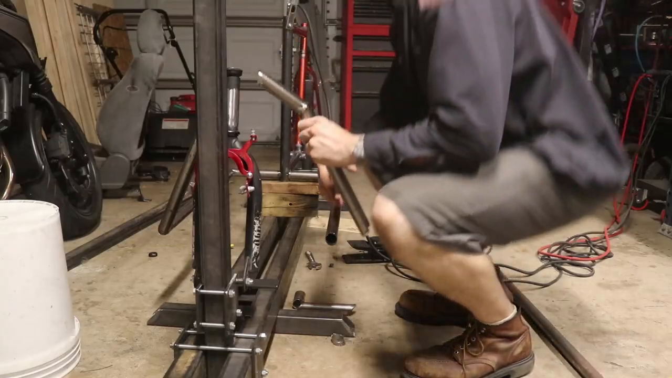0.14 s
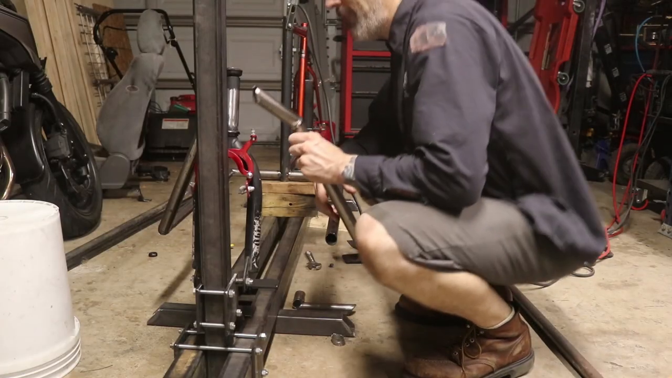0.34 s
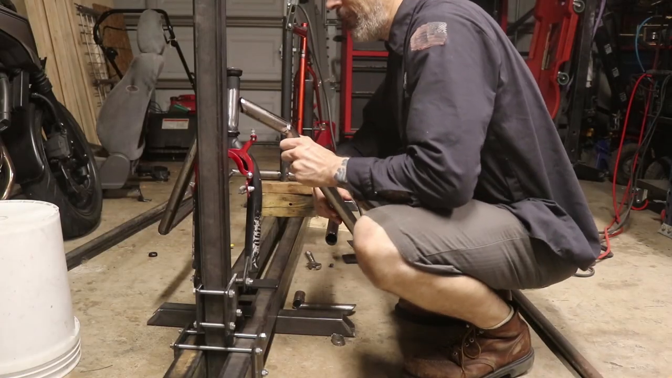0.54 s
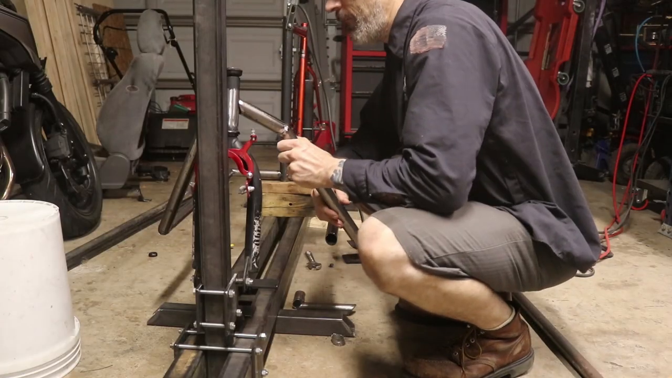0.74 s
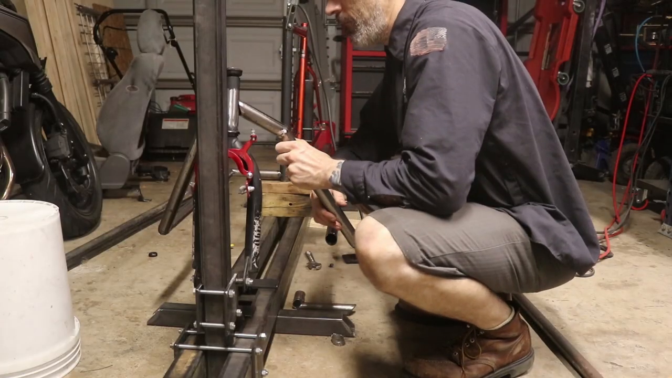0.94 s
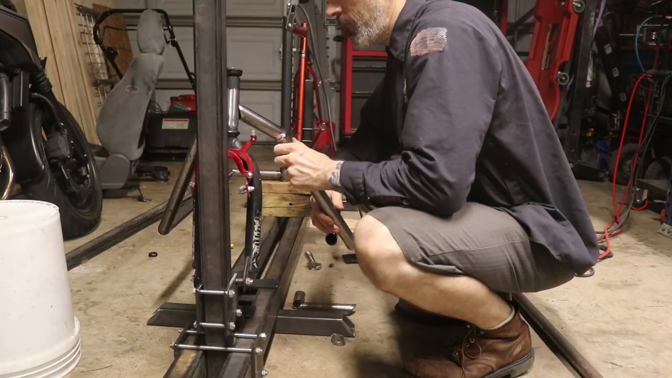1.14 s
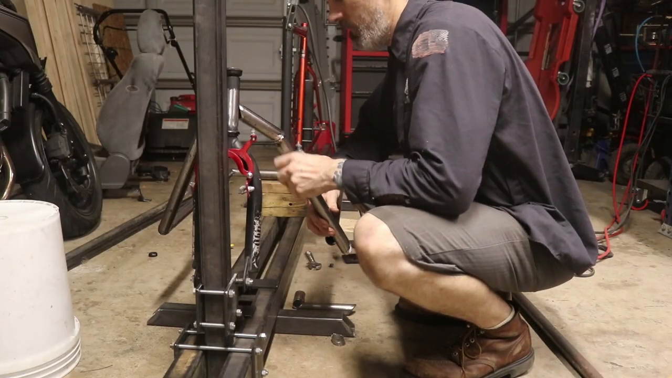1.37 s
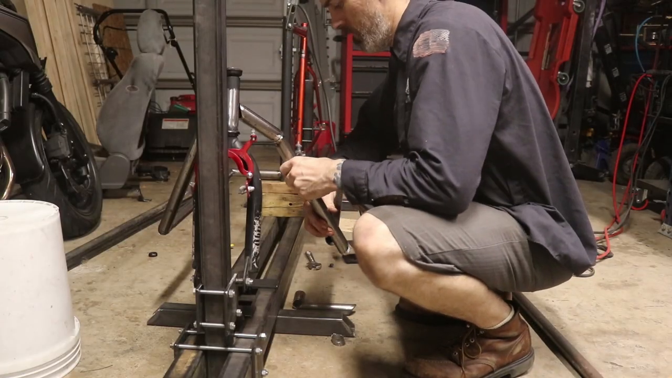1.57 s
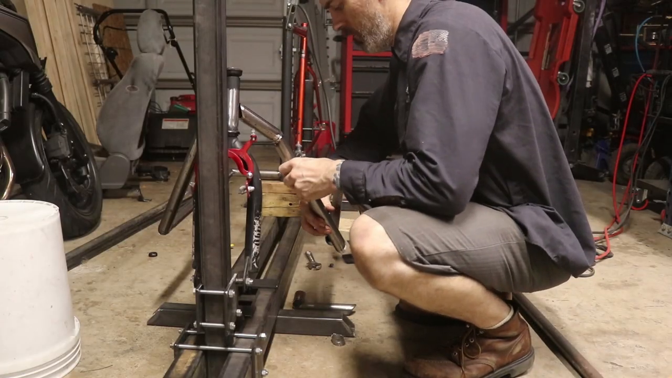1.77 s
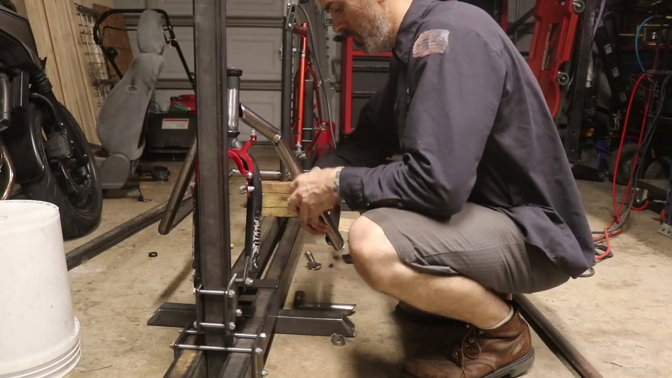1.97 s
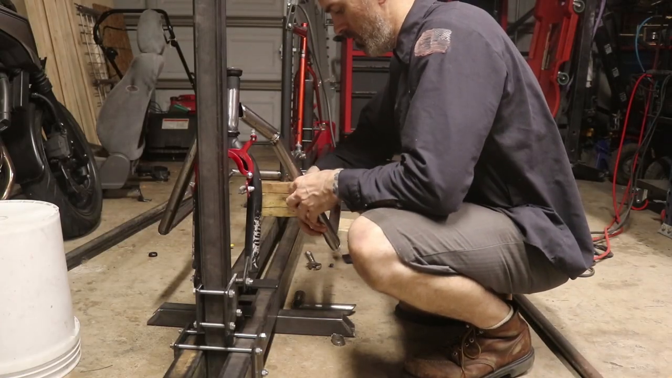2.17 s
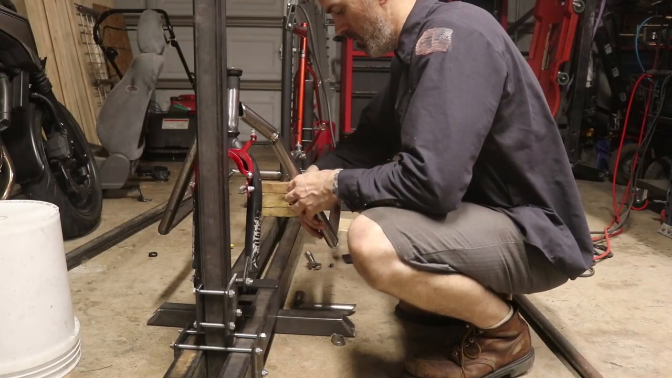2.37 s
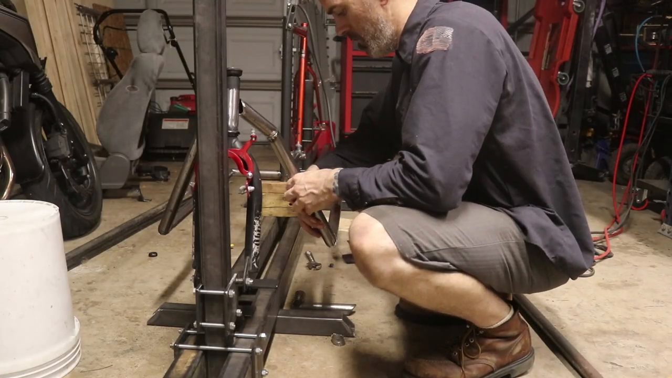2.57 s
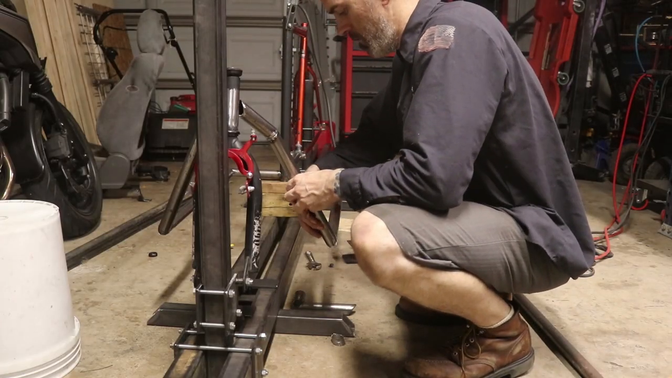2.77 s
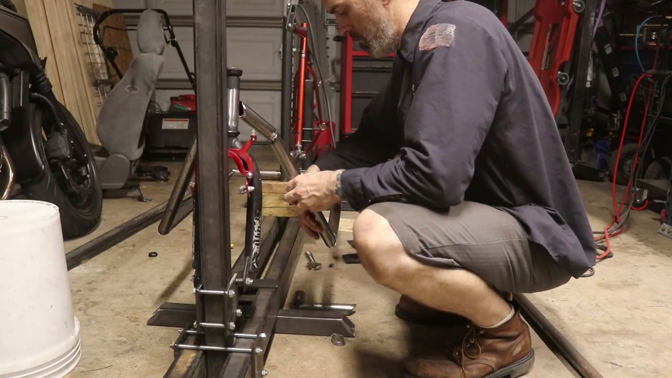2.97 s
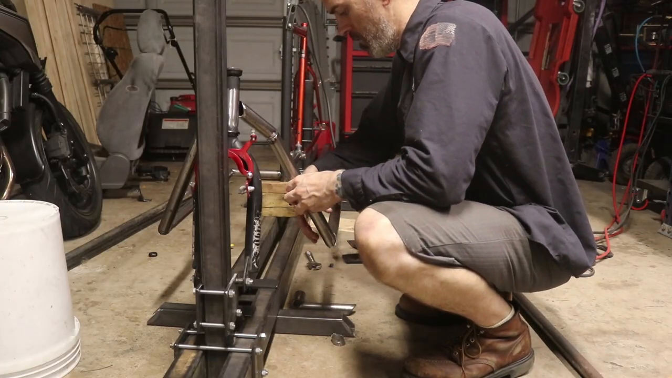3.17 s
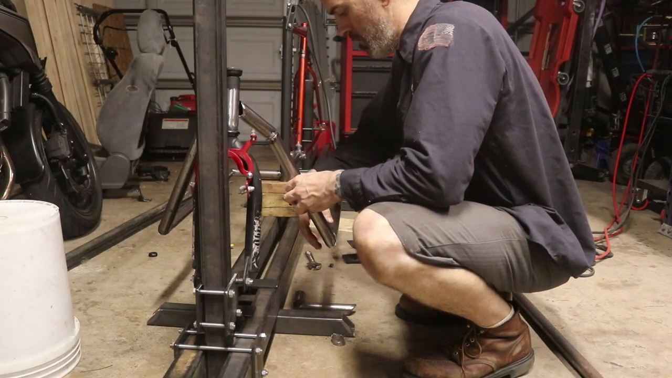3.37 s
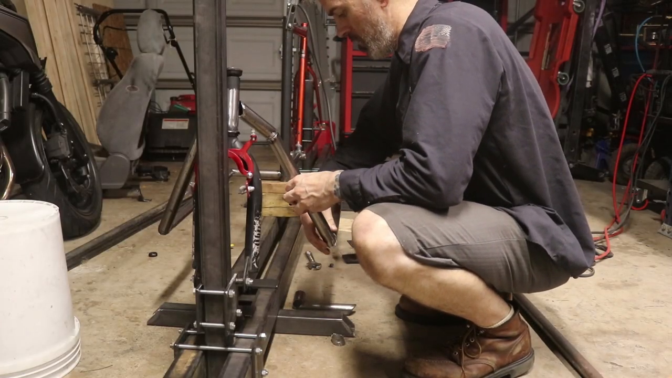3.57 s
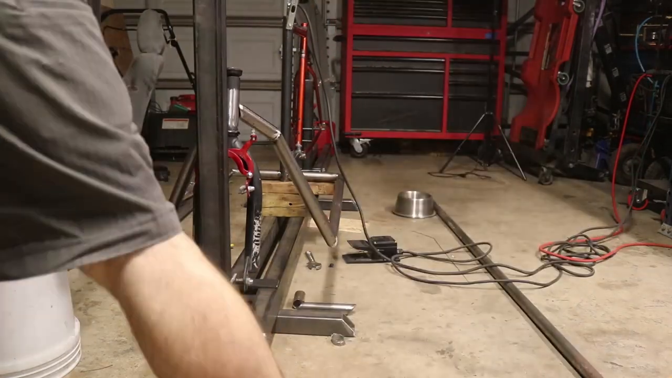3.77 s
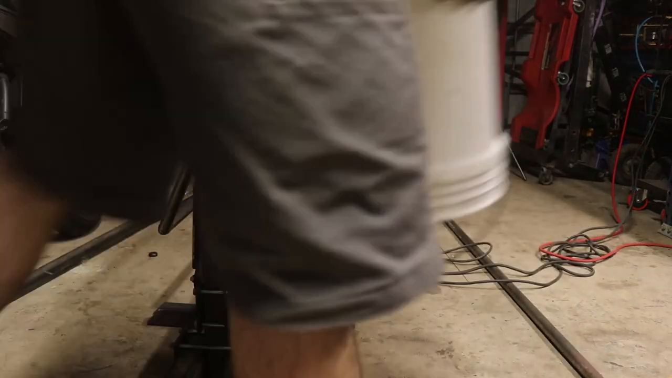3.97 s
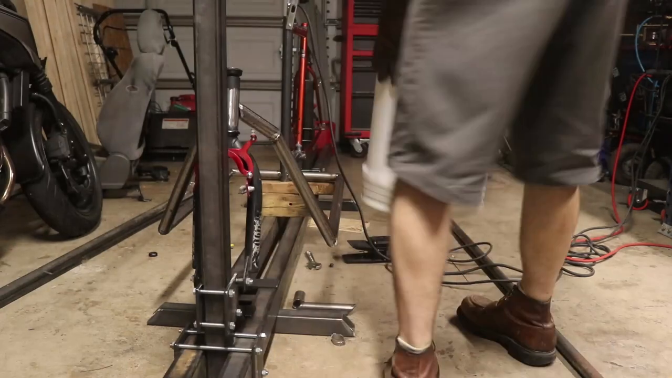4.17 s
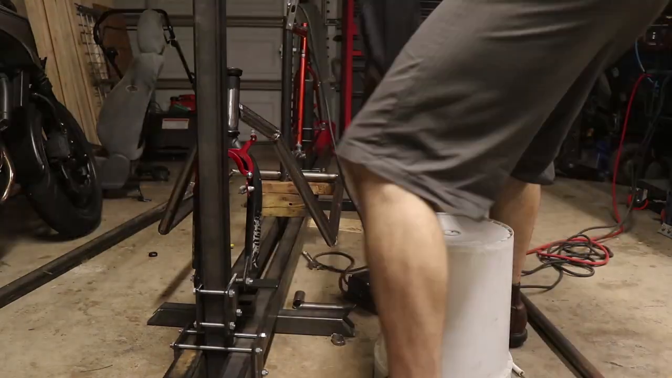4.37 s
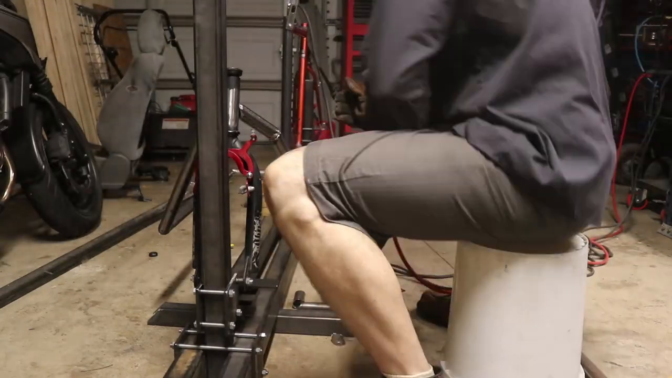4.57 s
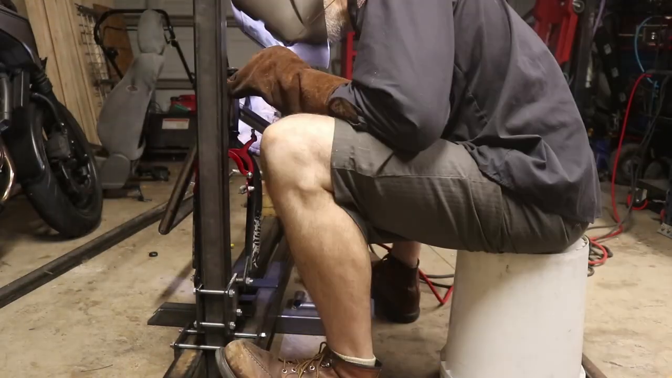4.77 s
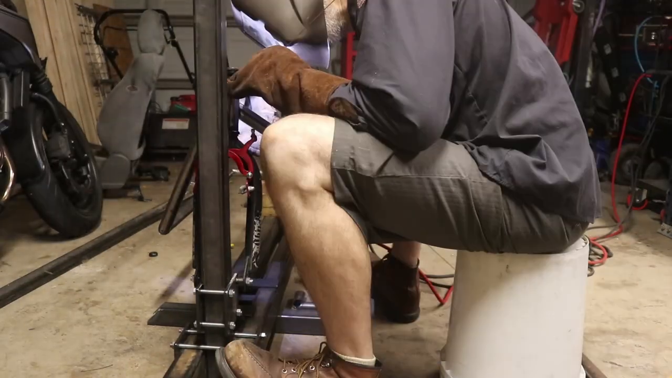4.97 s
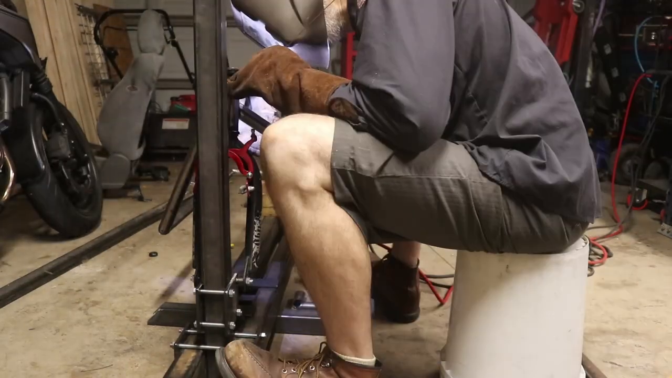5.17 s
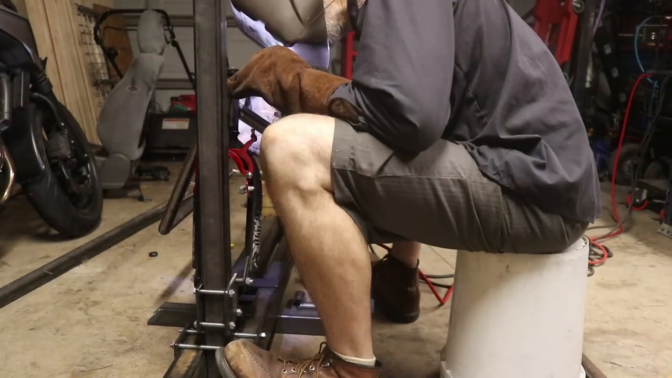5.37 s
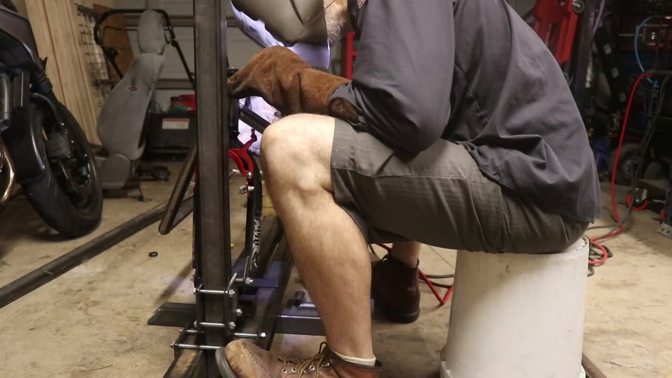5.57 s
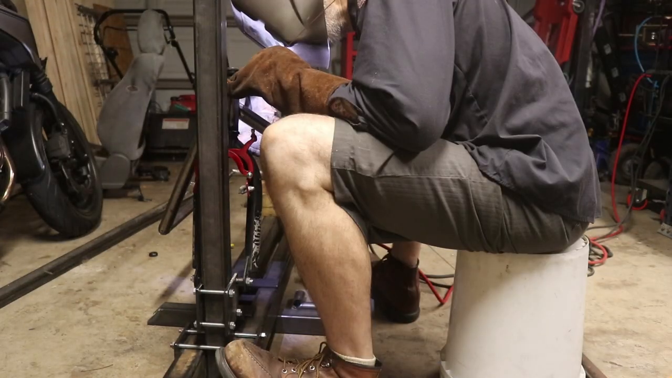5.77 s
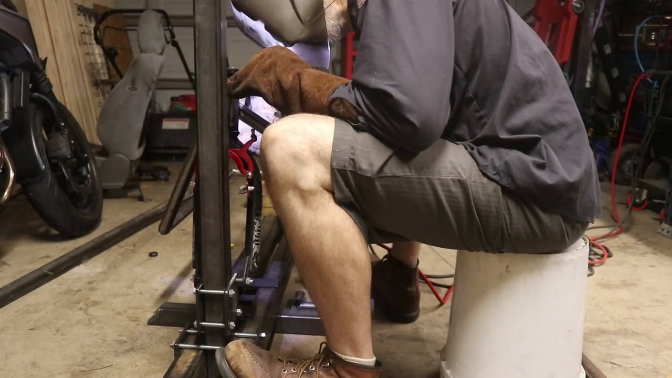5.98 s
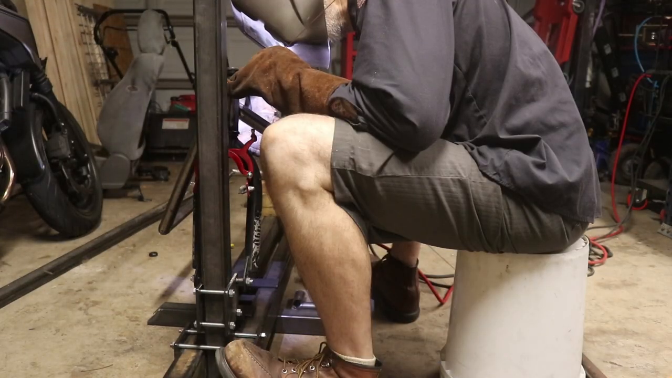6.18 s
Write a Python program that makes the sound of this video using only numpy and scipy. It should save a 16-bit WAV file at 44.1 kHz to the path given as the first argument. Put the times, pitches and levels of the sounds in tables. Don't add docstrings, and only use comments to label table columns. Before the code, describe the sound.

Sparse steel clinks and cloth rustles, an abrupt fast-motion burst of whining fan and plastic bucket thumps, then steady fan hum and crackling welding arc.

```python
import sys
import numpy as np
from scipy import signal
from scipy.fft import rfft, irfft, next_fast_len
from scipy.io import wavfile
from scipy.ndimage import map_coordinates

SR = 44100
rng = np.random.default_rng(int(sys.argv[2]) if len(sys.argv) > 2 else 0)


def bounce(signal):
    frames = np.transpose(np.atleast_2d(signal))
    limited = np.clip(frames, -1, 1)
    pcm = np.round(limited * 32767).astype(np.int16)
    wavfile.write(sys.argv[1], SR, pcm)


def magnitude_from_level(level_db):
    exponent = np.asarray(level_db, float) / 20
    return 10 ** exponent


N = 274302
TIME = np.arange(N) / SR
CUT_FAST, CUT_TRUE = 3.7755, 4.8435
SPEED = 7
TAIL = SR // 2


def unit(x):
    return x / np.sqrt(np.mean(x ** 2) + 1e-20)


def along(points, hz):
    f, v = np.transpose(points)
    return np.interp(np.log(hz + 1), np.log(f + 1), v)


def curves(rows):
    s, *cols = np.transpose(rows)
    return [np.interp(TIME, s, c, left=-150, right=-150) for c in cols]


def wobble(rate):
    return map_coordinates(rng.standard_normal(int(N * rate / SR) + 4), [TIME * rate])


def filtered(x, response):
    m = next_fast_len(len(x) + 8192)
    return irfft(rfft(x, m) * response(np.fft.rfftfreq(m, 1 / SR)), m)[:len(x)]


def low_cut(hz):
    return lambda f: (1j * f / (hz + 1j * f)) ** 4


def modes(peaks):
    def response(f):
        total = 0
        for k, (c, w, db) in enumerate(peaks):
            total = total + (-1) ** k * magnitude_from_level(db) * 1j * f * w / (c * c - f * f + 1j * f * w)
        return total
    return response


def rush(response, grain_db=0):
    return unit(filtered(rng.standard_normal(N) * magnitude_from_level(grain_db * wobble(400)), response))


def add(track, s, sound):
    part = track[round(s * SR):][:len(sound)]
    part += sound[:len(part)]


def stroke(s, hold, db, rise, fall, sag=0):
    t = TIME - s
    return db - rise * np.maximum(-t, 0) - sag * np.clip(t, 0, hold) - fall * np.maximum(t - hold, 0)


# frequency in Hz, density in dB per Hz.
FLOOR = [(12, -44.5), (20, -38), (59, -7), (122, -5), (246, -12), (298, -13), (383, -18.5), (1460, -29),
         (2100, -27), (2350, -30.5), (4580, -30), (5720, -31.5), (15600, -32.5)]
# frequency in Hz, level in dB rms.
LAMP_HUM = [(120, -65), (240, -64)]


def room_floor():
    out = magnitude_from_level(-55) * rush(lambda f: magnitude_from_level(along(FLOOR, f)))
    for hz, db in LAMP_HUM:
        out += magnitude_from_level(db + 3.0 * wobble(4.48)) * np.sin(2 * np.pi * hz * TIME)
    return out


# frequency in Hz, density in dB per Hz.
PORT_HISS = [(12, -19), (20, -8), (260, -10), (290, -12), (651, -10.5), (791, -11.5), (12800, -10),
             (15600, -9.5)]
PORT_HISS_DB = [-59.5, -67, -60]


def port_hiss(stretch):
    return magnitude_from_level(np.array(PORT_HISS_DB)[stretch]) * rush(lambda f: magnitude_from_level(along(PORT_HISS, f)))


# start in seconds, hold in seconds, level in dB, rise and fall in dB/s.
CLOTH_MOVES = [
    [(.035, 0.018, -48, 50, 47), (.234, 0.016, -45, 83, 41)],
    [(1.615, 0.072, -47, 62, 106), (1.938, .005, -61.5, 400, 170)],
]
# frequency in Hz, density in dB per Hz.
WEAVES = [
    [(180, -28), (300, 0), (446, 0), (631, -4), (697, -5.5), (1570, -6), (1940, -8.5), (4160, -6.5),
     (15600, -24)],
    [(880, -7), (1500, -7), (2220, -6.5), (2650, -1), (3350, -4.5), (4960, 0), (5410, -3.5), (15600, -14.5)],
]
# time in seconds, peak in dB, frequency in Hz.
SNAPS = [(0.0054, -31, 2540), (0.0358, -34, 3990), (0.0914, -40, 4370), (0.1496, -38, 4170),
         (0.187, -34, 4970), (0.2714, -35, 4130), (0.4968, -40, 4220), (0.5444, -41, 3420),
         (1.3668, -39, 1900), (1.408, -42, 8000), (1.4456, -41, 4180), (1.4945, -39, 4930),
         (1.5469, -39, 2640), (1.5913, -33, 4890), (1.6114, -35, 4920), (1.6734, -40, 2650),
         (1.7154, -35, 4350), (2.9841, -32, 4680), (2.9843, -36, 2600), (2.9846, -37, 6000)]


def cloth():
    out = np.zeros(N)
    for moves, weave in zip(CLOTH_MOVES, WEAVES):
        level_db = np.max([stroke(*move) for move in moves], axis=0) + 1.2 * wobble(30.4)
        out += magnitude_from_level(level_db) * rush(lambda f: magnitude_from_level(along(weave, f)), grain_db=2.0)
    t, snaps = TIME[:200], np.zeros(N)
    for s, db, hz in SNAPS:
        decay_db = 60 * t * hz / 7
        add(snaps, s, magnitude_from_level(db + 3 - decay_db) * np.cos(2 * np.pi * hz * t))
    return out + filtered(snaps, low_cut(300))


# start in seconds, length in seconds, first Hz, last Hz, level in dB.
SCREW_TURNS = [
    (2.685, .13, 11250, 11150, -72),
    (2.865, .108, 11050, 11250, -70),
    (2.99, .04, 10950, 10750, -77),
    (3.05, .05, 10550, 10300, -76),
    (3.196, .07, 10000, 9750, -77),
]


def squeak():
    arch_hz_per_s, edge_db_per_s = 1300, 1500
    out = np.zeros(N)
    for s, length, first_hz, last_hz, db in SCREW_TURNS:
        u = np.clip((TIME - s) / length, 0, 1)
        hz = first_hz + (last_hz - first_hz) * u + arch_hz_per_s * length * np.sin(np.pi * u)
        level = magnitude_from_level(stroke(s, length, db + 5.0, edge_db_per_s, edge_db_per_s))
        out += level * np.sin(2 * np.pi * np.cumsum(hz) / SR)
    return out


# frequency in Hz, t60 in seconds.
GARAGE = [(200, 0.76), (1000, 0.62), (4000, 0.44), (12000, 0.26)]


def garage(size):
    hz, t, z = signal.stft(rng.standard_normal(size), SR, nperseg=256)
    decay = magnitude_from_level(-60 * t / along(GARAGE, hz)[:, None])
    tail = signal.istft(z * decay, SR, nperseg=256)[1][:size]
    return tail / np.linalg.norm(tail)


# time in seconds, peak in dB, brightness in dB per octave.
TAPS = [
    [(0.644, -24, -3)],
    [(0.837, -20.5, -2.5)],
    [(1.106, -43, -1), (1.127, -36, -2.5), (1.148, -38, -5), (1.183, -29, -4), (1.233, -38, -5),
     (1.366, -57, -2)],
    [(2.205, -49, -1.5), (2.462, -44.5, -0.5), (2.474, -41.5, -3), (2.5, -41.5, -5)],
    [(2.814, -34, -7), (2.849, -51, -3)],
    [(2.983, -36.5, -5.5), (3.029, -62, -19), (3.139, -50.5, 5)],
    [(3.3195, -40.5, -6), (3.352, -42, -8)],
]
# frequency in Hz, width in Hz, level in dB.
LOOSE = [(478, 51, -8), (892, 21, -4), (1070, 95, -8), (1556, 12, 2), (1910, 32, -3.5), (3000, 54, -25),
         (3550, 30, -10), (3670, 22, -4), (3900, 22, -15), (4400, 30, -2.5), (4910, 9.8, -2),
         (5860, 24, -6), (6400, 26, -24), (7570, 27, -8.5)]
HELD = [(415, 34, -1.5), (878, 40, 0), (1020, 43, 1), (1380, 110, 0.5), (1893, 41, 4.5), (2520, 62, -2),
        (3520, 40, -10), (3850, 32, -5.5), (4390, 27, -4), (4550, 13, -5), (4630, 13, -7), (5490, 40, -12),
        (5800, 40, -13), (6750, 29, -22), (11800, 37, -32)]
SEATING = [(431, 84, 0.5), (857, 11, -9), (1012, 40, 3), (1495, 220, -5.5), (1320, 54, -3), (1860, 57, 2.5),
           (2557, 30, -8.5), (3550, 47, -8), (4380, 60, -9.5), (4840, 33, -8), (5920, 45, -18),
           (6600, 53, -17), (7200, 51, -20), (7800, 57, -18), (10400, 100, -28), (11950, 100, -22)]
CLAMPED = [
    [(508, 95, -3.5), (780, 120, -8.5), (1013, 68, -9), (1840, 77, -8.5), (2490, 68, -13), (2730, 41, -12),
     (3550, 42, -17), (4340, 32, -8), (4800, 40, -16), (5480, 56, -13)],
    [(397, 93, -8.5), (823, 69, -5), (1020, 79, -10), (1654, 95, -4), (2740, 43, -15), (4450, 110, -8.5),
     (6000, 100, -22)],
    [(380, 67, -11), (1020, 130, -6.5), (1890, 56, -12), (2680, 46, -15), (3900, 60, -16),
     (4500, 110, -4.5), (5800, 85, -24)],
    [(498, 37, -6.5), (1020, 61, -1.5), (1530, 54, -9), (1910, 25, -12), (2570, 18, -9), (3610, 20, -12),
     (4400, 49, -18), (4560, 40, -7)],
]
GRIPS = [LOOSE, HELD, SEATING, *CLAMPED]


def tube_taps():
    out, t = np.zeros(N), TIME[:TAIL]
    for taps, grip in zip(TAPS, GRIPS):
        loose = modes([(hz, w * (1.46 + hz / 7000), db) for hz, w, db in grip])
        for s, db, tilt_db in taps:
            tilt = lambda f: magnitude_from_level(tilt_db * np.log2((f + 200) / 1200)) * f / (f + 300)
            blow = garage(size=TAIL) * (1 + 0.86 * magnitude_from_level(-60 * t / 0.018))
            clatter = filtered(blow, lambda f: (loose(f) + magnitude_from_level(-15.0) / (1 + (f / 7000) ** 2)) * tilt(f))
            ring = np.zeros(TAIL)
            for hz, w, level_db in grip:
                decay = magnitude_from_level(level_db - 60 * t / (0.88 * along(GARAGE, hz)))
                weight = tilt(hz) / (1 + (hz / 3200) ** 2) / (1 + w / 30)
                ring += decay * weight * np.sin(2 * np.pi * hz * t)
            both = clatter / np.std(clatter[:1500]) + magnitude_from_level(-3.5) * ring / np.std(ring[:1500])
            add(out, s, magnitude_from_level(db - 10.5) * both * (1 - np.exp(-t / 0.00036)))
    return out


# start in seconds, hold in seconds, level in dB, rise and fall in dB/s.
SLIDES = [
    (1.121, 0.054, -33, 214, 1500),
    (2.485, 0.03, -47.5, 122, 150),
    (2.816, 0.083, -52, 400, 65),
]


def tube_slides():
    out = np.zeros(N)
    for move, grip in zip(SLIDES, GRIPS[2:5]):
        rubbed = modes([(hz, w * (.8 + hz / 12000), db) for hz, w, db in grip])
        scrape = lambda f: magnitude_from_level(-23.5) * f / (f + 500) / (1 + (f / 6000) ** 2)
        rub = magnitude_from_level(stroke(*move) - 3.5) * rush(lambda f: rubbed(f) + scrape(f), grain_db=3.5)
        out += .5 * rub + signal.fftconvolve(rub, garage(size=TAIL))[:N]
    return out


# start in seconds, frequency in Hz, level
# in dB, t60 in seconds.
THUDS = [(.645, 448, -40.5, 0.59), (.645, 1012, -43, 0.39), (.645, 1934, -40.5, 0.73),
         (.84, 300, -47, 0.94), (.84, 1870, -45, 0.37), (0.899, 157.5, -42.5, 0.71),
         (0.646, 1556, -33.5, .6), (.645, 4365, -47, .3), (1.186, 3600, -36, .04),
         (1.2022, 1500, -31, .012), (1.2275, 1700, -31, .01), (1.2465, 1500, -33, .012),
         (1.2515, 1800, -33, .01), (.838, 1840, -30, .15), (1.126, 1880, -35, .25), (1.131, 1885, -36, .2),
         (1.13, 1012, -39, 0.37), (1.182, 1880, -29, .16), (1.182, 1400, -33, .08),
         (1.228, 1013, -39, 0.52), (1.181, 278, -37.5, 0.51), (1.183, 1024, -32, 0.3),
         (2.473, 273, -50.5, 1), (2.47, 510, -49, 0.4), (2.82, 259, -44.5, 0.51), (2.816, 2740, -58, .6),
         (2.83, 1650, -54, .6), (2.816, 830, -50, .5), (2.47, 830, -54, .4), (3.15, 3950, -62, .2),
         (3.322, 3600, -60, .15), (2.821, 1020, -58, 0.47), (2.984, 1500, -40, .012),
         (2.989, 420, -46.5, 0.47), (3.324, 1036, -47, 0.65), (3.328, 268, -58, 0.62),
         (3.348, 514, -65, 0.52)]


def frame_thuds():
    out, t = np.zeros(N), TIME[:TAIL]
    for s, hz, db, t60 in THUDS:
        onset = 1 - np.exp(-t * hz / 3)
        add(out, s, magnitude_from_level(db - 60 * t / t60) * np.sin(2 * np.pi * hz * t) * onset)
    return out


# null in seconds, level in dB of the swell after it, null depth in dB.
NULLS = [(3.66, -35, -6), (3.875, -33, -6), (4.012, -28, -16), (4.093, -30, -22), (4.178, -28, -26),
         (4.259, -29, -12), (4.346, -35, -26), (4.401, -29, -22), (4.548, -46, -24), (4.615, -32, -20),
         (4.782, -34, -14), (4.88, -36, -9)]


def passing():
    s, db, null_db = np.transpose(NULLS)
    place = np.interp(TIME, s, np.arange(len(s)))
    deep = magnitude_from_level(np.interp(TIME, s, np.minimum(null_db, -1)))
    swell = np.abs(np.sin(np.pi * place)) ** 0.89
    return db[place.astype(int)] - 1.5 + 20 * np.log10(deep + (1 - deep) * swell)


# time in seconds, level in dB.
SEATED = [(4.84, -42), (5.05, -44), (5.11, -36), (5.2, -46), (5.52, -38), (5.56, -35), (5.95, -29),
          (6.23, -31)]


def settling():
    return curves(SEATED)[0]


# frequency in Hz, density in dB per Hz.
AIR = [
    [(18, -91), (30, -59), (110, -50), (203, -40.5), (325, -29.5), (360, -32.5), (534, -19.5), (811, -21.5),
     (974, -13), (1690, -5.5), (2050, -6), (3000, -10.5), (3510, -6.5), (4000, -8.5), (7300, -11),
     (15600, -17.5)],
    [(12, -83), (20, -48), (104, -26.5), (246, -7), (429, -15), (521, -8.5), (566, -12), (962, -15),
     (1050, -14), (1270, -17), (1630, -18.5), (1880, -20.5), (4330, -26), (15600, -56)],
]
# frequency in Hz, width in Hz, lift in dB.
HOUSING = [(244, 25, 2.5), (276, 25, 3), (336.5, 18, 5.5), (841, 21, 6.5), (1043, 17, 7.5), (1178, 29, 4.5),
           (1546, 20, 6), (1651, 21, 8), (2100, 50, 3.5), (4220, 520, 3)]
# frequency in Hz, level in dB.
BLADE = [(517, 2.5), (1037, -12.5), (539, -18)]


def fan(air_db, tone_db, air, speed):
    def lift(f):
        peaks = [1 + (magnitude_from_level(db) - 1) / (1 + (2 * (f / speed - c) / w) ** 2) for c, w, db in HOUSING]
        return np.prod(peaks, axis=0)
    out = magnitude_from_level(air_db + 0.55 * wobble(6 * speed)) * rush(lambda f: magnitude_from_level(along(air, f)) * lift(f))
    for k, (hz, db) in enumerate(BLADE):
        phase = 2 * np.pi * hz * speed * TIME + 0.34 * speed ** .35 * wobble(4 * speed)
        if k == 0:
            level_db = tone_db + 1.0 * wobble(8 * speed)
        else:
            level_db = air_db - 9.5 + 3 * wobble(2.3 * speed)
        out += magnitude_from_level(level_db + db + 4.5) * np.sin(phase)
    return out


# time in seconds, frequency in Hz, level in dB.
TRAFFIC = [(3.78, 347, -62), (3.9, 337, -62), (3.96, 321.5, -59), (4.02, 310, -74), (4.1, 317, -72),
           (4.14, 322, -57), (4.3, 313, -59), (4.37, 299, -71)]


def traffic():
    hz, db = curves(TRAFFIC)
    return magnitude_from_level(db) * np.sin(2 * np.pi * np.cumsum(hz) / SR)


# time in seconds, peak in dB, frequency in Hz, t60 in seconds.
BUMPS = [(3.8665, -18, 682, 0.041), (3.8669, -21, 547, 0.051), (3.8688, -11.5, 1080, 0.032),
         (3.872, -13, 1032, 0.036), (3.8728, -11.5, 690, 0.03), (3.8765, -16, 1150, 0.018),
         (3.881, -18, 2000, 0.0091), (3.935, -20, 1970, 0.02), (3.988, -22, 1140, .015),
         (4.136, -25, 1620, 0.044), (4.157, -14, 1740, 0.018), (4.18, -23, 1940, .04),
         (4.256, -24, 1000, 0.011), (4.297, -30, 618, 0.019), (4.299, -17.5, 1300, 0.011),
         (4.3478, -13, 2900, .008), (4.347, -14, 4700, .012), (4.347, -16, 6950, .03),
         (4.535, -18, 6950, .03), (3.869, -19, 7000, .008), (3.8645, -22, 2100, .008),
         (4.347, -13.5, 1513, 0.068), (4.353, -26, 1015, .06), (4.362, -23, 1060, 0.062),
         (4.414, -17, 1210, 0.012), (4.43, -15, 1270, 0.011), (4.489, -24, 1070, 0.025),
         (4.503, -17.5, 1080, .02), (4.515, -21, 900, .03), (4.522, -22, 1050, .03),
         (4.526, -12, 1100, .03), (4.5275, -19, 2950, .012), (4.530, -9, 1260, 0.04),
         (4.536, -10, 1260, 0.025), (4.541, -13, 1140, 0.025), (4.5458, -12, 1100, 0.03),
         (4.548, -11, 1100, 0.018), (4.5555, -14, 1050, .02), (4.560, -13.5, 800, 0.039),
         (4.565, -16, 900, .02), (4.5705, -16, 1080, .03), (4.579, -8, 1130, 0.049),
         (4.589, -18, 1250, .03), (4.595, -18, 1210, .025), (4.6103, 0.5, 1170, 0.022),
         (4.61, -13.5, 2610, 0.0093), (4.6132, -7, 1170, 0.027), (4.6195, -11, 1100, 0.013),
         (4.633, -28, 1170, 0.018)]
# start in seconds, hold in seconds, drum level in dB, grit level in dB.
DRAGS = [(3.869, 0.0073, -25.5, -21.5), (3.886, .02, -32.5, -60), (4.3475, 0.0014, -45, -15),
         (4.354, 0.016, -41, -17), (4.496, .012, -36, -50), (4.521, .01, -20.5, -27),
         (4.526, .006, -19, -23), (4.533, 0.018, -18, -17.5), (4.555, .022, -19, -19),
         (4.575, 0.021, -20.5, -21.5), (4.61, 0.00084, -34, -22.5), (4.61, 0.023, -21.5, -50),
         (4.667, 0.013, -32, -50), (4.7, 0.0024, -33, -25)]
# frequency in Hz, width in Hz, level in dB.
DRUM = [(536, 160, -7.5), (706, 100, 0), (1006, 105, 5), (1170, 200, 0.5), (1566, 130, -23),
        (2980, 610, -21)]
# frequency in Hz, density in dB per Hz.
GRIT = [(1760, -40), (3000, -8), (3900, -30), (5540, -7.5), (8160, -12), (9490, -8), (15600, -18.5)]


def bucket():
    out, t = np.zeros(N), TIME[:4000]
    for s, db, hz, t60 in BUMPS:
        note = np.sin(2 * np.pi * hz * t) + 0.071 * np.sin(2 * np.pi * .62 * hz * t)
        note *= magnitude_from_level(-60 * t / np.clip(t60, .004, .06))
        slap = 0.83 * magnitude_from_level(-60 * t / 0.0062) * np.sin(2 * np.pi * 1.18 * hz * t)
        add(out, s, magnitude_from_level(db - 0.5) * (note + slap) * (1 - np.exp(-t / 0.00028)))
    drum_db = [stroke(s, hold, db, rise=1800, fall=1400, sag=160) for s, hold, db, _ in DRAGS]
    grit_db = [stroke(s, hold, db, rise=6300, fall=3700, sag=260) for s, hold, _, db in DRAGS]
    out += magnitude_from_level(np.max(drum_db, axis=0)) * rush(modes(DRUM), grain_db=1.0)
    out += magnitude_from_level(np.max(grit_db, axis=0)) * rush(lambda f: magnitude_from_level(along(GRIT, f)), grain_db=2.0)
    bass_cut = lambda f: low_cut(28 * SPEED)(f) ** 2 / np.sqrt(1 + (430 / (f + 1)) ** 12)
    out = filtered(out, bass_cut)
    return out + 0.021 * out ** 2


# time in seconds, peak in dB, t60 in seconds.
SHORTS = [(6.1288, -5.5, 0.014), (6.1292, -10.5, .02), (6.133, -12, .01), (6.1375, -19, .015),
          (6.1425, -14, .012), (6.1464, -8, 0.025), (6.1515, -11, .015), (6.154, -12, 0.019),
          (6.165, -16, 0.013), (6.17, -7.5, 0.032), (6.1735, -15, 0.033), (6.186, -18, .02),
          (6.1915, -18, .015), (6.1945, -17, .015), (6.2, -22, .015), (6.2075, -22, .015),
          (6.214, -25, .015)]
# frequency in Hz, width in Hz, level in dB.
STEEL_WORK = [(1100, 60, 7.5), (1870, 110, 4.5), (2740, 190, -0.5), (3260, 100, -1.5), (3820, 180, 3),
              (4240, 140, 1), (5930, 200, -4), (6460, 500, -8.5), (7900, 530, -17), (9100, 600, -9.5),
              (10500, 400, -16), (10000, 780, -18), (12020, 110, -5.5), (15500, 500, -18)]


def arc():
    sizzle_db, spray_db, crack_db = -31, -8.5, 13
    size = magnitude_from_level(sizzle_db) * (TIME >= SHORTS[0][0])
    t, cracks = TIME[:4000], np.zeros(N)
    for s, db, t60 in SHORTS:
        cracks[round(s * SR)] = magnitude_from_level(db + crack_db - 8)
        add(size, s, magnitude_from_level(db - 10.5 - 60 * t / max(t60, .004)))
    sparks = rng.standard_normal(N) * magnitude_from_level(1.4 * wobble(900))
    steel = modes(STEEL_WORK)
    gain = np.std(sparks) * np.sqrt(np.mean(np.abs(steel(np.linspace(0, SR / 2, 2000))) ** 2))
    spray = rush(lambda f: f / (f + 1500) / (1 + (f / 7000) ** 4), grain_db=1.5)
    ringing = filtered((size * sparks + cracks) / gain, lambda f: steel(f) * low_cut(300)(f))
    return magnitude_from_level(spray_db) * size * spray + ringing


def scene():
    stretch = np.searchsorted([CUT_FAST, CUT_TRUE], TIME)
    steel = tube_taps() + tube_slides() + frame_thuds()
    mid = (TIME < CUT_FAST) * (room_floor() + cloth() + squeak() + steel)
    duck_db = np.maximum(stroke(4.545, hold=0.034, db=5.2, rise=390, fall=38), 0)
    fast_fan = fan(-26 - duck_db, passing(), AIR[0], SPEED * .998)
    mid += (stretch == 1) * fast_fan + traffic() + bucket()
    fade_in = np.clip((TIME - CUT_TRUE) / 0.0028, 0, 1)
    mid += fade_in * fan(-26, settling(), AIR[1], 1) + arc()
    side = port_hiss(stretch)
    return np.array([mid + side, mid - side])


def roll_off(x):
    return signal.sosfilt(signal.butter(12, 16630, fs=SR, output="sos"), x)


def record(dry):
    band = lambda f: np.where(f < 15790, 1, magnitude_from_level(-60))
    mix = np.array([filtered(x, band) for x in dry])
    return roll_off(mix)


dry = scene()
out = record(dry)
bounce(out)
```